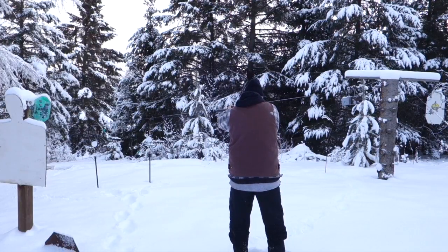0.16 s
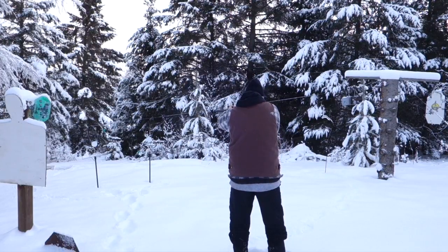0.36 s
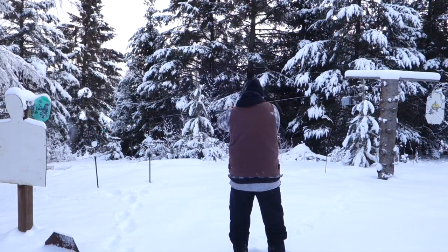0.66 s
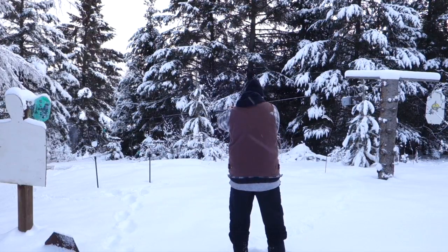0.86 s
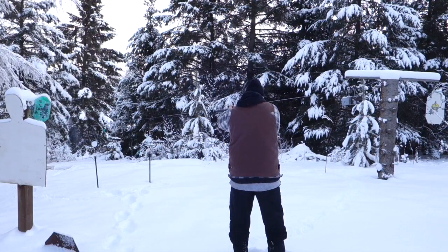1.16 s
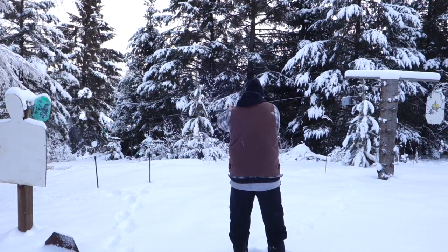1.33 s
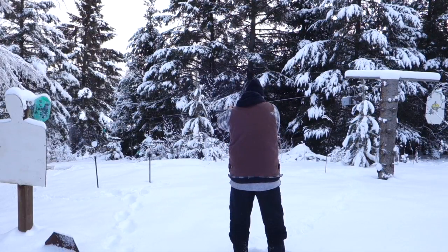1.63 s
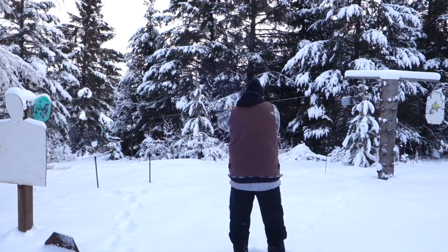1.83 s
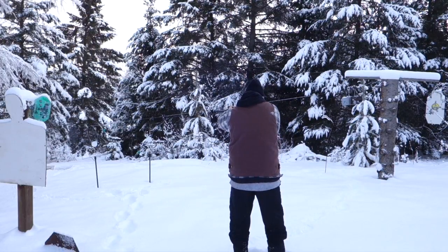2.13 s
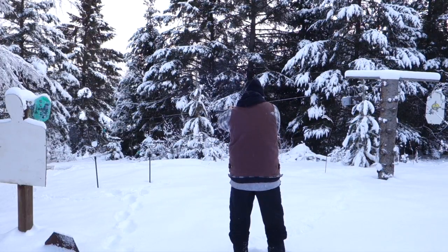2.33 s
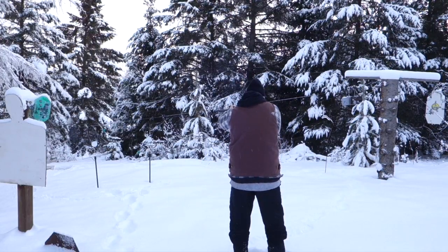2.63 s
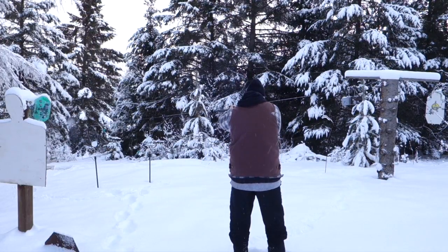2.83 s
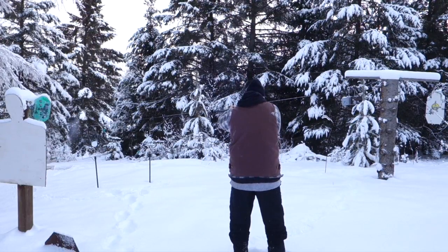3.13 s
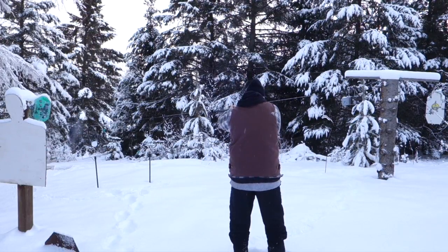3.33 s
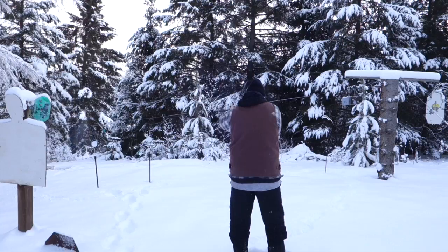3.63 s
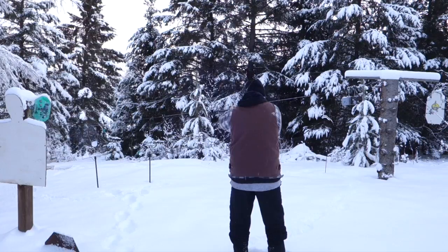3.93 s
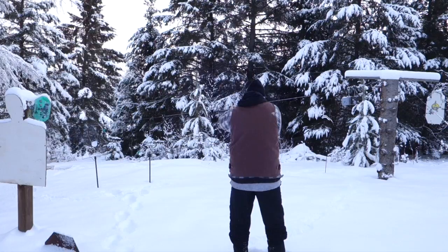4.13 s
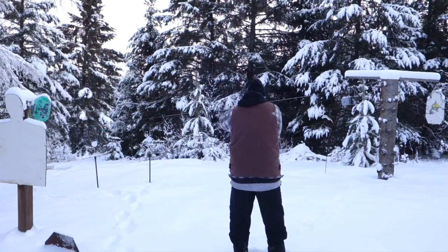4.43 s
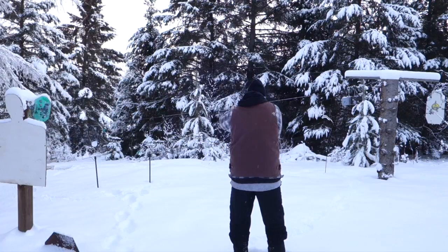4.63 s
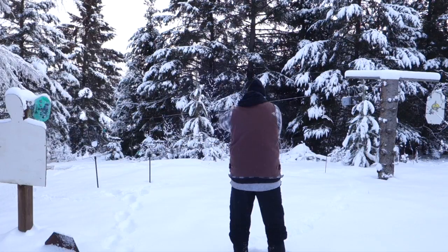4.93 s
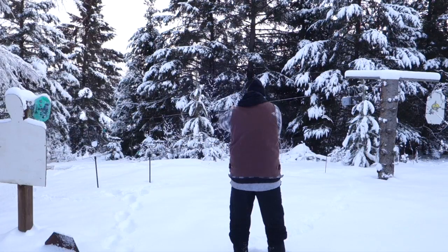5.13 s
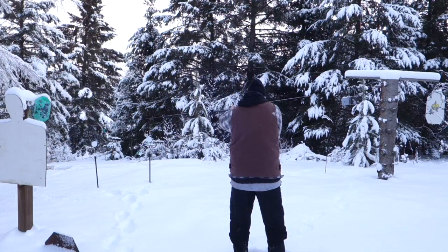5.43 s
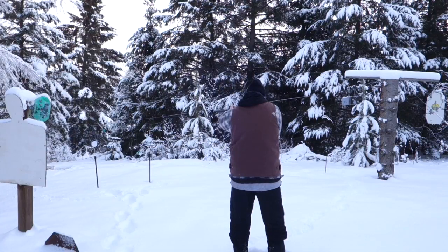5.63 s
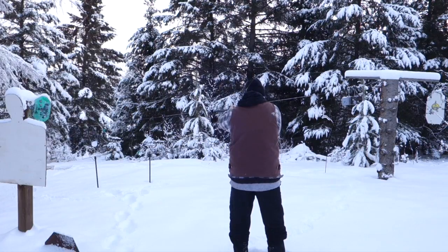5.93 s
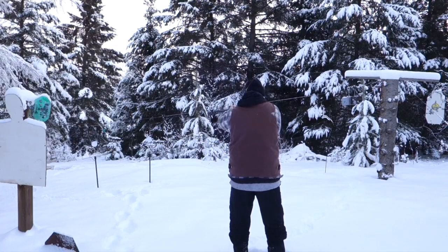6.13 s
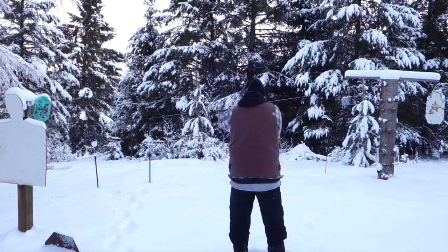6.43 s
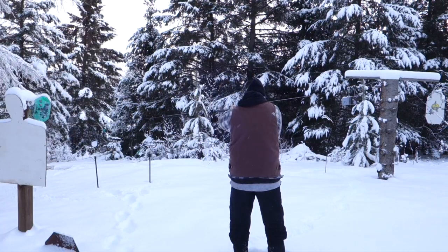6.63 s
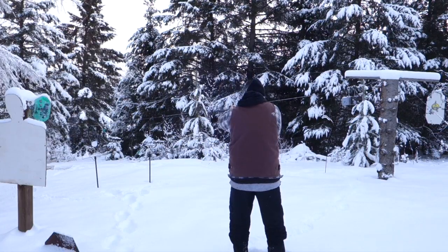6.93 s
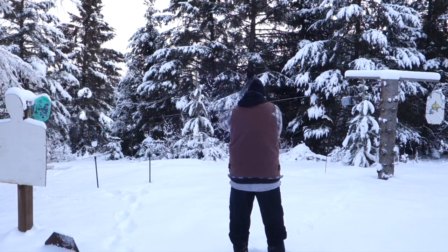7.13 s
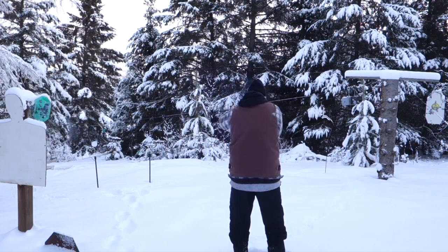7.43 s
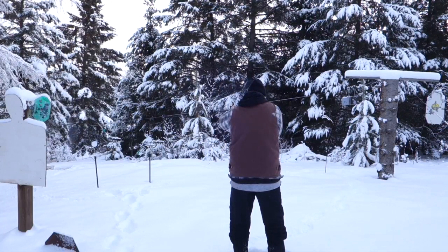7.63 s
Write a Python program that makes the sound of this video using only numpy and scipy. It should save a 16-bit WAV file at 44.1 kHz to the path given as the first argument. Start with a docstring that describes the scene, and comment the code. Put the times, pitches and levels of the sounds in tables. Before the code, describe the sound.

Eight suppressed rifle shots in a snowy yard among firs, the first two cracking and rolling through the trees, the rest muffled with wood-smacking bullets.

```python
"""Eight shots from a suppressed carbine in a snowy yard ringed by firs, a few metres from a microphone pair.
Each is a hammer tick, a muffled blast and a clack of the action: shaped pulses and short noise bursts.
Yard and trees throw it back as a hiss of scattered grains; the first two bullets are supersonic,
and their crack rolls back from trunk after trunk. The slower ones smack into the woods with a slap,
a knock and a snap; two tumble away as gliding whines. Dry ticks, low thumps and a far-off rush fill in."""
import sys
import numpy as np
from scipy import signal
from scipy.fft import rfft, irfft, next_fast_len
from scipy.io import wavfile
from scipy.ndimage import uniform_filter1d

SR = 44100
rng = np.random.default_rng(int(sys.argv[2]) if len(sys.argv) > 2 else 0)


def waveform_to_disk(signal):
    """Save audio, clipped to [-1, 1], as 16-bit WAV at the path in sys.argv[1]."""
    frames = np.transpose(np.atleast_2d(signal))
    scaled = np.clip(frames, -1, 1) * 32767
    samples = np.round(scaled).astype(np.int16)
    wavfile.write(sys.argv[1], SR, samples)


N = 342657  # length in samples
EDGE_HZ = 11150  # top of the heard band


def amp(db):
    """Decibels to a linear factor."""
    return 10 ** (np.asarray(db) / 20)


def evened(x):
    """Scales a signal to unit RMS."""
    return x / np.sqrt(np.mean(x ** 2) + 1e-20)


def seconds(length):
    """Sample times over a length in seconds."""
    return np.arange(int(length * SR)) / SR


def read(points, hz):
    """A spectrum joined by straight lines on a log-frequency axis."""
    f, value = np.transpose(points)
    return np.interp(np.log(hz + 1), np.log(f + 1), value)


def add(mix, s, sound):
    """Lays a mono or stereo sound into the mix at time s."""
    part = mix[:, max(round(s * SR), 0):][:, :sound.shape[-1]]
    part += sound[..., :part.shape[1]]


def colour(x, points, size=4096):
    """Causal filter with the given spectrum shape and unit energy below the band edge."""
    log_gain = np.log(amp(read(points, abs(np.fft.fftfreq(size, 1 / SR)))))
    minimum_phase = np.exp(np.conj(signal.hilbert(log_gain)))
    taps = np.fft.ifft(minimum_phase).real[:size // 2]
    heard = abs(rfft(taps, size)[:int(size * EDGE_HZ / SR)]) ** 2
    taps = taps / np.sqrt(2 * heard.sum() / size)
    return signal.fftconvolve(np.atleast_2d(x), taps[None], axes=1)


def emphasise(x, hz, db, octaves=0.21):
    """Lifts one broad resonance, which rings on after what excites it."""
    size = next_fast_len(x.shape[1])
    distance = np.log2((abs(np.fft.fftfreq(size, 1 / SR)) + 1) / hz) / octaves
    log_gain = np.log(amp(db * np.exp(-distance ** 2)))
    response = np.exp(np.conj(signal.hilbert(log_gain)))
    return irfft(rfft(x, size) * response[:size // 2 + 1], size)


def pair(x, same, left_db, left_lead_s=0):
    """Blends two signals into a microphone pair whose likeness follows a table over frequency."""
    size = next_fast_len(x.shape[1])
    a, b = rfft(x, size)
    hz = np.fft.rfftfreq(size, 1 / SR)
    likeness = np.clip(read(same, hz), -1, 1)
    mid = np.sqrt((1 + likeness) / 2) * a
    side = np.sqrt((1 - likeness) / 2) * b
    bearing = amp(left_db / 2) * np.exp(1j * np.pi * hz * left_lead_s)
    return irfft(np.array([(mid + side) * bearing, (mid - side) / bearing]), size)[:, :x.shape[1]]


def burst(t60):
    """Two unrelated dying puffs of noise, each of unit energy."""
    t = seconds(.12)
    x = rng.standard_normal((2, len(t))) * amp(-60 * t / t60)
    return x / np.linalg.norm(x, axis=1, keepdims=True)


def scatter(strength, grain_db, clump_db, loss_db, loss_power, shade=lambda hz, delay: 0,
            pop_share=0, pops_per_s=700, size=256):
    """Echoes of countless branches, in clumps; shade colours them by delay, and long paths lose treble."""
    t = seconds(1.7)
    grain_level = amp(grain_db * np.minimum(rng.exponential(1, len(t)), 4))
    grains = evened(rng.standard_normal((2, len(t))) * grain_level)
    # thick boughs answer one by one
    signs = np.sign(rng.standard_normal((2, len(t))))
    pops = evened(signs * (rng.random(len(t)) < pops_per_s / SR))
    share = np.clip(pop_share, 0, 1)
    knots = np.arange(0, t[-1], .003)
    clumps = amp(clump_db * np.interp(t, knots, np.clip(rng.standard_normal(len(knots)), -2, 2)))
    echoes = evened((np.sqrt(1 - share) * grains + np.sqrt(share) * pops) * clumps)
    echoes = echoes * strength(t) * np.minimum((t[-1] - t) * 2, 1)  # fades out over the last half second
    hz, delay, z = signal.stft(echoes, SR, nperseg=size)
    khz = hz[:, None] / 1000
    gain_db = shade(hz[:, None], delay) - loss_db * khz ** loss_power * delay
    return signal.istft(z * amp(gain_db), SR, nperseg=size)[1]


def stand(delay, near_s, far_s, db, rise_db, fall_db):
    """Echo of a stand of trees: full from near to far edge, falling by dB per doubling of delay outside."""
    doublings = np.log2(delay + 1e-4)
    before = np.maximum(np.log2(near_s) - doublings, 0)
    beyond = np.maximum(doublings - np.log2(far_s), 0)
    return amp(db - rise_db * before - fall_db * beyond)


# The far-off rush as it reaches the microphones. Each row: frequency in Hz, relative level in dB per Hz.
RUSH_TONE = [(25, -46), (100, -37), (150, -22.5), (250, -7.5), (400, -6), (520, 2.5), (800, -1),
             (1200, -1.5), (1700, -8.5), (2400, -17.5), (3400, -26.5), (5000, -33), (11000, -31.5)]
# Faint far-off hums. Each row: centre in Hz, width in Hz, level in dB before it swells.
HUMS = [(480.5, 19, -64), (159, 11, -84)]
RUSH_DB = -52  # before it swells


def air(hum_swell_db=3, swell_db=-1.73):
    """A far-off rush over the snow (coloured noise), with faint hums (narrow noise) that come and go."""
    rush = evened(colour(rng.standard_normal((2, N)), RUSH_TONE)[:, :N])
    slow_noise = rng.standard_normal((1 + len(HUMS), N))
    swell, *hum_swells = (evened(uniform_filter1d(x, size=14000, mode="wrap")) for x in slow_noise)
    out = pair(amp(RUSH_DB + swell_db * swell) * rush, FOREST_SAME, left_db=2.5, left_lead_s=4e-5)
    for (hz, width_hz, db), hum_swell in zip(HUMS, hum_swells):
        band = np.exp(-((np.fft.rfftfreq(N, 1 / SR) - hz) / width_hz) ** 2)
        hum = evened(irfft(rfft(rng.standard_normal(N)) * band, N))
        out = out + amp(db + hum_swell_db * hum_swell) * hum
    return out


# The low push at the microphones. Each row: frequency in Hz, relative level in dB per Hz.
THUMP_TONE = [(25, -8), (60, -1), (95, 3), (200, 4), (500, -38), (11000, -73.5)]


def thumps(push_db=-33.0, shut_db=-37, strike_db=-42, rumble_db=-70, t60=.4):
    """A low push with each blast, bolt closing and bullet strike; a dying rumble follows each blast."""
    out, t = np.zeros((2, N)), seconds(.4)
    push = colour(np.ones(1), THUMP_TONE)
    for s, _, shut_s, *_ in SHOTS:
        add(out, s, amp(push_db) * push)
        add(out, s + shut_s, amp(shut_db) * push)
        rumble = rng.standard_normal(len(t)) * amp(rumble_db - 60 * t / t60)
        add(out, s, colour(rumble, THUMP_TONE))
    for s, knock_db, *_ in IMPACTS:
        add(out, s, amp(strike_db + knock_db) * push)
    return out


# Small dry ticks, perhaps spent cases landing.
# Each row: start in seconds, level in dB before a common 3.5 dB cut, pitch of the ring in Hz.
TICKS = [(.830, -15.5, 6000), (1.651, -10.5, 2380), (1.851, -9.5, 1700), (2.072, -30.5, 7040)]


def ticks(ring_db=6):
    """Brief dry ticks between the first three shots: noise bursts lifted around one pitch."""
    out = np.zeros((2, N))
    for s, db, hz in TICKS:
        tick = colour(burst(t60=0.043), [(100, -36), (800, 9.5), (1800, 14), (4000, 0), (11000, -17)])
        add(out, s, amp(db - 3.5) * emphasise(tick, hz, ring_db, octaves=1.0))
    return pair(out, FOREST_SAME, left_db=-1.0)


# Bullets tumbling away. Each row: start in seconds, length in seconds, starting pitch in Hz,
# level in dB before the fade and flutter.
WHINES = [(3.557, 0.72, 834, -40), (4.499, 0.224, 710, -46)]
WHINE_ATTACK_S, WHINE_FADE_DB_PER_S = 0.05, 27.5
WHINE_RISE, WHINE_SETTLE_S = 0.18, 0.41  # the pitch climbs towards this share more, fast at first


def whines(waver=0.00098, flutter_db=1.3, lower_db=-3, lower_fade_db_per_s=22):
    """A tumbling bullet chops the air twice a turn, rising as it fades; the octave below dies sooner."""
    out = np.zeros((2, N))
    for s, length, hz, db in WHINES:
        t = seconds(length)
        slow_noise = rng.standard_normal((2, N))
        drift, flutter = (evened(uniform_filter1d(x, size=900))[:len(t)] for x in slow_noise)
        rise = WHINE_RISE * (1 - np.exp(-t / WHINE_SETTLE_S))
        phase = 2 * np.pi * np.cumsum(hz * (1 + rise + waver * drift)) / SR
        ends = np.minimum(np.minimum(t, length - t) / WHINE_ATTACK_S, 1)
        level = ends * amp(db - WHINE_FADE_DB_PER_S * t + flutter_db * flutter)
        turn = amp(lower_db - lower_fade_db_per_s * t) * np.sin(phase / 2)  # once a turn
        add(out, s, level * (np.sin(phase) + turn))
    return out


# Slow bullets striking wood and frozen ground. Each row: start in seconds, relative knock level in dB,
# relative splinter level in dB, pitch of the struck thing in Hz.
IMPACTS = [(2.569, 0.5, -7.5, 1300), (2.681, 3.5, 5.5, 2550), (2.701, 5.5, 0, 1940), (2.712, 1, -9.5, 1690),
           (3.418, 3, -1.5, 2210), (3.526, -14, 1, 2820), (3.557, -7.5, -7, 1300), (3.589, 2, -0.5, 450),
           (4.36, 6, -8, 1300), (4.507, -3, -3, 2420), (4.546, 0, -2.5, 465), (4.621, -3, -11.5, 1270),
           (5.322, 2, 5.5, 2800), (5.456, 0, 1, 1400), (5.571, -8.5, -15.5, 2800), (6.233, 5, -10, 2820),
           (6.354, -19, -1, 3470), (6.491, -10, -15.5, 1000), (7.156, -8, 0.5, 3400), (7.18, 2, -3.5, 1270),
           (7.314, -5.5, -18, 750)]
# A dull knock, also heard in the gas jet and bolt. Each row: frequency in Hz, relative level in dB per Hz.
KNOCK_TONE = [(30, -35.5), (140, -26), (300, -2), (900, 5.5), (1400, 5.5), (2800, 2.5), (5000, -3),
              (11000, -29.5)]


def impacts(echo_db=-41, echo_at_s=0.085, wetter_db=3, echo_t60=0.53, ring_db=4.0,
            slap_db=-6.0, thud_db=-6.5, snap_db=-2):
    """Slap, dull knock and splintering snap; echoes gain wetter_db per doubling of time since the shot."""
    out, t = np.zeros((2, N)), seconds(0.4)
    slap = amp(slap_db) * colour(np.ones(1), KNOCK_TONE) * [[1], [0]]
    echo_tone = [(200, -9.5), (1800, 1), (4000, -4.5), (11000, -9)]
    for s, knock_db, splinter_db, hz in IMPACTS:
        flight_s = min(s - fired for fired, *_ in SHOTS if fired < s)
        echoes = amp(echo_db + wetter_db * np.log2(flight_s / echo_at_s) - 60 * t / echo_t60)
        strike = np.zeros((2, len(t)))
        add(strike, 0, amp(knock_db) * slap)
        thud = (knock_db + thud_db, burst(t60=0.048), KNOCK_TONE)
        snap = (splinter_db + snap_db, burst(t60=0.075), CLACK_TONE)
        for db, puff, tone in (thud, snap):
            tail = colour(rng.standard_normal((2, len(t))) * echoes, echo_tone)
            add(strike, 0, amp(db) * colour(puff, tone))
            add(strike, 0, amp(db) * colour(tail, tone))
        add(out, s, emphasise(strike, hz, ring_db, octaves=0.35))
    return pair(out, FOREST_SAME, left_db=1.5, left_lead_s=3.5e-5)


def forest_strength(delay):
    """The crack swells through the woods behind the yard, then returns again from a distant stand."""
    woods = stand(delay, near_s=0.13, far_s=.27, db=-11.5, rise_db=6, fall_db=15.0)
    distant = stand(delay, near_s=0.79, far_s=0.98, db=-21.0, rise_db=27, fall_db=11)
    return np.hypot(woods, distant)


def forest_shade(hz, delay, thin_db=13.0, thin_s=0.1, thin_hz=1600, pitch_hz=3300, halving_s=0.15,
                 pitch_db=5, octaves=0.93, fade_s=0.083):
    """Near twigs return little bass; the shock wave lengthens with travel, so its echo sinks in pitch."""
    twigs_db = thin_db / (1 + (delay / thin_s) ** 4) / (1 + (hz / thin_hz) ** 4)
    distance = np.log2((hz + 1) * (1 + delay / halving_s) / pitch_hz) / octaves
    return pitch_db * np.exp(-distance ** 2 - delay / fade_s) - twigs_db


# Supersonic bullets. Each row: start in seconds, relative level of the long forest echo in dB.
CRACKS = [(.1440, 1.7), (1.0184, 2)]
# Big trunks that return a crack as a separate pop. Each row: delay in seconds,
# pop level in dB after the first shot, the same after the second, both before the bounce off the snow.
TRUNKS = [(0.026, -4, -1.5), (.0854, -2.5, -3), (.095, 1.5, -1.5), (.245, -2, -1), (0.2966, 3, 4.5),
          (0.3206, -0.5, -6), (.756, -7, -9), (.813, -19, -9.5), (0.8338, -18, -12.5), (.934, -18, -10.5),
          (.989, -24, -18), (1.29, -14, -19)]
# The woods' long echo. Each row: frequency in Hz, relative level in dB per Hz.
FOREST_TONE = [(25, -56), (140, -50.5), (200, -50.5), (320, -21.5), (700, -5), (1350, 3), (2500, 0.5),
               (3200, -3.5), (6000, -6.5), (11000, -4.5)]
# A pop off a trunk. Each row: frequency in Hz, relative level in dB per Hz, before it is sharpened.
TRUNK_TONE = [(30, -71), (170, -34), (330, 8), (750, 18.5), (1400, 14), (2600, -4), (5000, -36),
              (11000, -45.5)]
# How alike the two microphones hear the woods. Each row: frequency in Hz, correlation from -1 to 1.
FOREST_SAME = [(100, 1), (600, 0.96), (1400, 0.65), (2600, 0.69), (4500, 0.093), (11000, 0.22)]


def cracks(ground_s=.0023, ground_db=-3, sharp_hz=2300, sharp_db=16, sharp_s=0.08):
    """The shock wave sweeps the same trees on both shots, so its long echo repeats."""
    echoes = scatter(forest_strength, grain_db=2.2, clump_db=2.0, loss_db=17.5, loss_power=0.75,
                     shade=forest_shade, pop_share=0.38)
    forest = colour(echoes, FOREST_TONE)
    pulse, out = colour(np.ones(1), TRUNK_TONE) * [[1], [0]], np.zeros((2, N))
    for shot, (s, db) in enumerate(CRACKS):
        add(out, s, amp(db) * forest)
        for delay, *trunk_db in TRUNKS:  # a clean pop, sharper from near trunks, and its bounce off the snow
            pop = emphasise(pulse, sharp_hz, sharp_db * np.exp(-delay / sharp_s), octaves=0.95)
            pop = amp(trunk_db[shot]) * pop / np.linalg.norm(pop)
            add(out, s + delay, pop)
            add(out, s + delay + ground_s, amp(ground_db) * pop)
    return pair(out, FOREST_SAME, left_db=0.54, left_lead_s=3.5e-5)


def yard_strength(delay, snow_s=0.0059, snow_db=-25.0, first_tree_s=.02):
    """Only open snow answers until the first trees; their echo holds, then thins with distance."""
    trees = stand(delay, near_s=0.025, far_s=0.099, db=-20.0, rise_db=8.5, fall_db=10.0)
    return np.where(delay < first_tree_s, amp(snow_db) * (delay > snow_s), trees)


def yard_shade(hz, delay, tilt_db=2.5, flat_below_hz=500, pivot_hz=2000):
    """Needles and twigs throw back more treble than bass, by tilt_db an octave."""
    return tilt_db * np.log2(np.maximum(hz, flat_below_hz) / pivot_hz)


# The yard's hiss. Each row: frequency in Hz, relative level in dB per Hz.
YARD_TONE = [(25, -42.5), (130, -34), (250, -2.5), (600, 8), (1300, 8), (1750, 1), (2400, 5.5), (3300, 3.5),
             (4300, 0), (7500, 0), (11000, -2.5)]
# How alike the two microphones hear the yard. Each row: frequency in Hz, correlation from -1 to 1.
YARD_SAME = [(100, 0.91), (400, 0.97), (900, 0.81), (2000, 0.66), (4500, 0.089), (11000, -0.88)]


def yard(near_s=0.15, far_s=0.21):
    """The hiss of each blast returns from the near trees first, then from deeper in the woods."""
    out = np.zeros((2, N))
    for s, _, _, near_db, far_db, peak_hz, peak_db in SHOTS:
        echoes = scatter(yard_strength, grain_db=1.7, clump_db=2.0, loss_db=11.0, loss_power=0.75,
                         shade=yard_shade)
        delay = np.arange(echoes.shape[1]) / SR
        depth_db = np.interp(delay, [near_s, far_s], [near_db, far_db])
        add(out, s, emphasise(echoes * amp(depth_db), peak_hz, peak_db))
    return pair(colour(out, YARD_TONE)[:, :N], YARD_SAME, left_db=0.15, left_lead_s=2e-5)


# The shots, a few metres off. Each row: start in seconds, relative blast level in dB,
# seconds until the bolt shuts, relative yard echo in dB, relative deep-woods echo in dB,
# peak of the hiss in Hz, lift at that peak in dB.
SHOTS = [(.1440, -2, 0.071, -6.5, -1.5, 2580, -0.5), (1.018, 0.5, .094, -10, -2.5, 2700, 14.5),
         (2.525, 0, 0.1, -3.5, 2.5, 1970, 5), (3.3718, 0.5, 0.09, -3.5, 6, 7500, 0.5),
         (4.3211, 1.5, .089, -3, 3, 2900, 2.5), (5.2688, 0.5, .092, -3.5, 1, 2800, 1.5),
         (6.1899, 2.5, 0.1, -2.5, -4.5, 7970, 1), (6.9875, 2.5, 0.094, -4, -2.5, 5500, 4.5)]
# The muffled blast. Each row: frequency in Hz, relative level in dB per Hz.
BLAST_TONE = [(25, -41.5), (140, -16.5), (290, 2.5), (700, 4), (1000, -9.5), (1250, 11), (1700, -15.5),
              (4000, -43), (11000, -15.5)]
# The clack of the action, also the snap of wood. Each row: frequency in Hz, relative level in dB per Hz.
CLACK_TONE = [(30, -46), (300, -28.5), (900, -6.5), (2500, 0), (4500, 2), (7500, 0), (11000, -5)]


def carbine(ground_s=0.00346, ground_db=-3, clack_s=0.0028, clack_db=-3, hammer_s=0.0096, hammer_db=-23,
            blast_gain_db=-4, jet_db=-9, shut_db=2.5, shut_knock_db=-10):
    """The hammer falls, the blast leaves the suppressor and bounces off the snow, the bolt slams shut."""
    out = np.zeros((2, N))
    blast = amp(blast_gain_db) * colour(np.ones(1), BLAST_TONE)
    hammer_tone = [(100, -26.5), (700, -4), (2200, 0.0), (5000, -8.0), (11000, -25)]
    for s, blast_db, shut_s, *_ in SHOTS:
        add(out, s - hammer_s, amp(hammer_db) * colour(burst(t60=0.041)[0], hammer_tone))
        add(out, s, amp(blast_db) * blast)
        add(out, s + ground_s, amp(blast_db + ground_db) * blast)
        add(out, s, amp(blast_db + jet_db) * colour(burst(t60=0.028)[0], KNOCK_TONE))  # gas jet
        add(out, s + clack_s, amp(clack_db) * colour(burst(t60=0.011)[0], CLACK_TONE))  # bolt flies back
        add(out, s + shut_s, amp(shut_db) * colour(burst(t60=.04), CLACK_TONE))
        add(out, s + shut_s, amp(shut_knock_db) * colour(burst(t60=0.022)[0], KNOCK_TONE))
    return out


def scene():
    """All layers at the microphones, from the background to the carbine."""
    return air() + thumps() + ticks() + whines() + impacts() + cracks() + yard() + carbine()


def record(dry, knee=.62):
    """The highest peaks are rounded off; then the band limit."""
    over = np.maximum(abs(dry) - knee, 0)
    soft = dry - np.sign(dry) * (over - .12 * np.tanh(over / .12))
    low_pass = signal.firwin(401, EDGE_HZ, window=("kaiser", 8), fs=SR)
    return signal.oaconvolve(soft, low_pass[None], "same")


dry = scene()
out = record(dry)
waveform_to_disk(out)
```